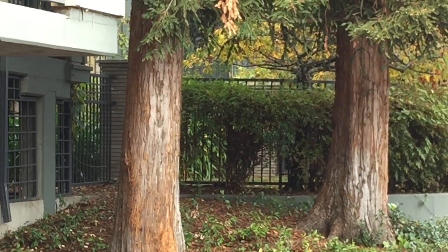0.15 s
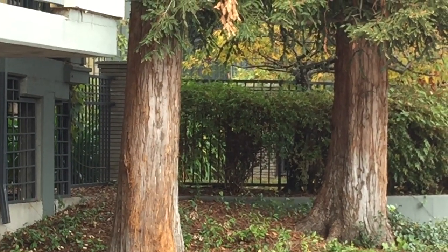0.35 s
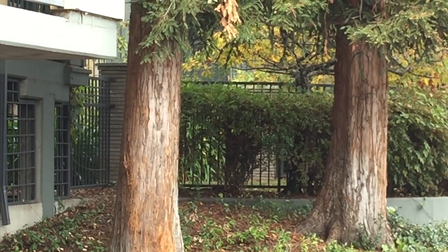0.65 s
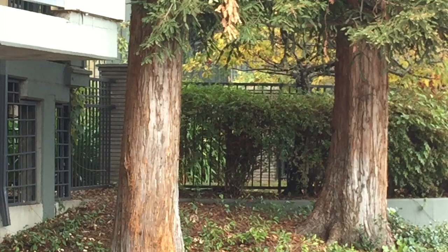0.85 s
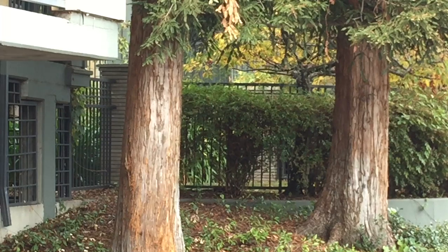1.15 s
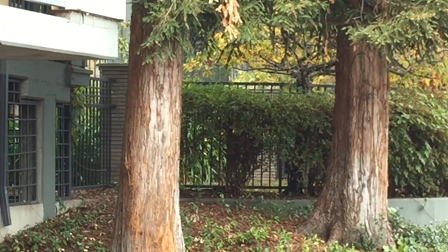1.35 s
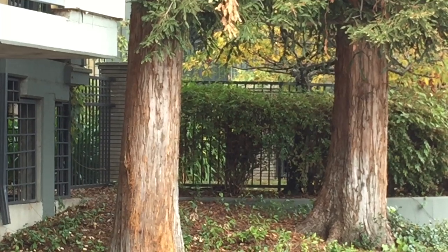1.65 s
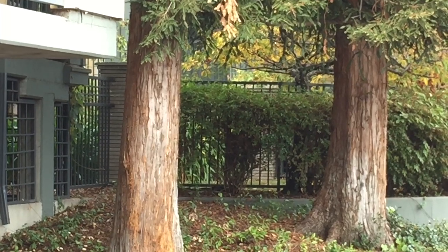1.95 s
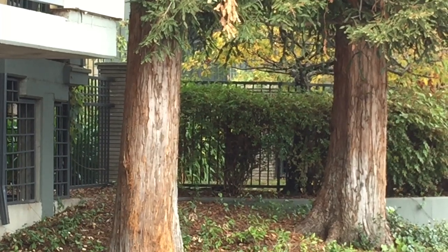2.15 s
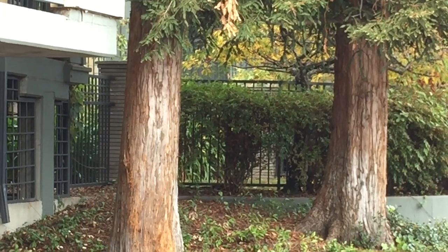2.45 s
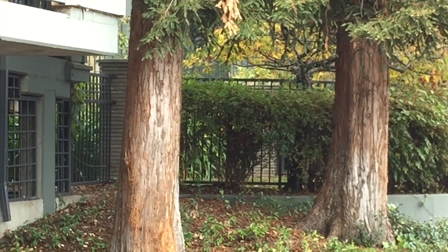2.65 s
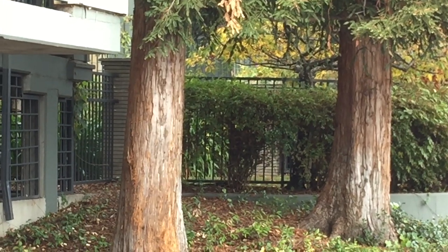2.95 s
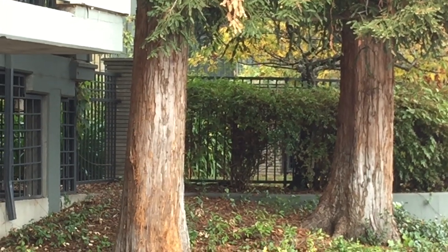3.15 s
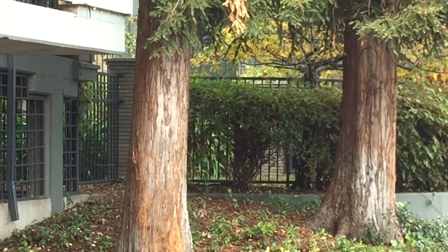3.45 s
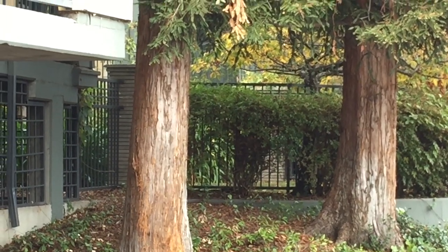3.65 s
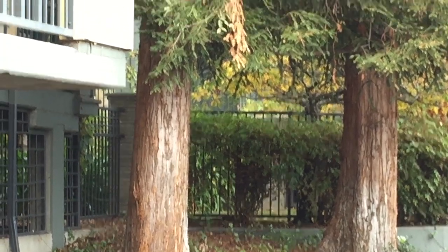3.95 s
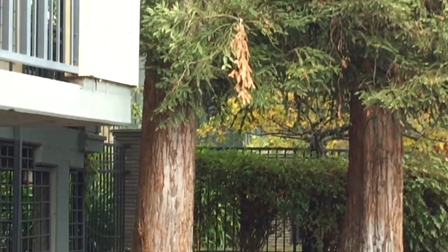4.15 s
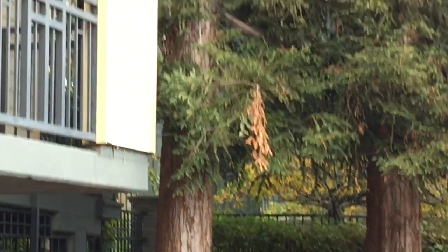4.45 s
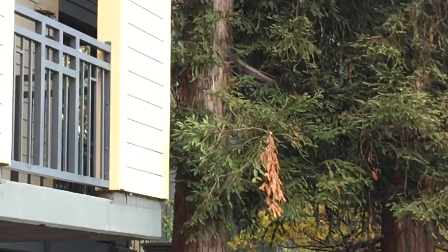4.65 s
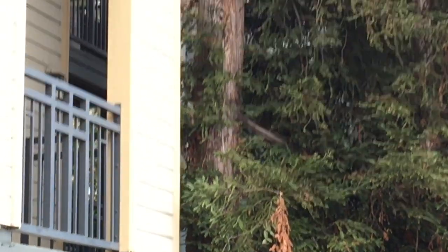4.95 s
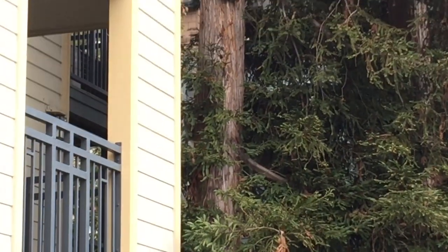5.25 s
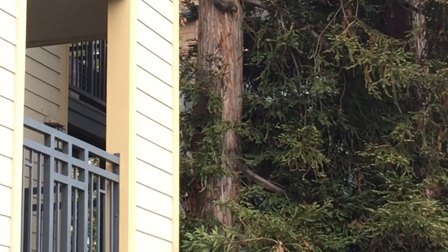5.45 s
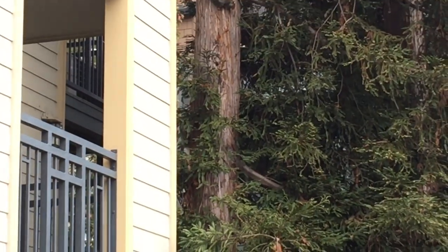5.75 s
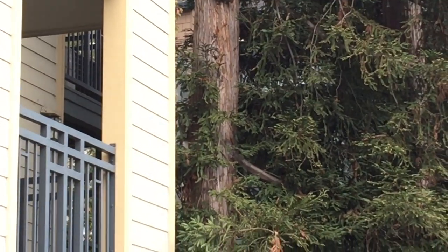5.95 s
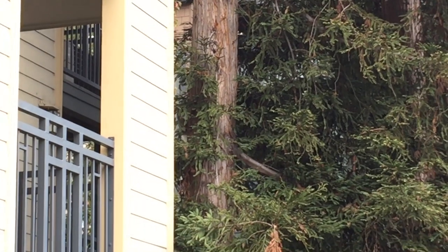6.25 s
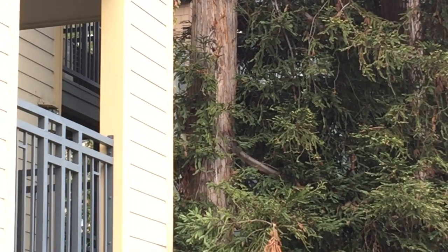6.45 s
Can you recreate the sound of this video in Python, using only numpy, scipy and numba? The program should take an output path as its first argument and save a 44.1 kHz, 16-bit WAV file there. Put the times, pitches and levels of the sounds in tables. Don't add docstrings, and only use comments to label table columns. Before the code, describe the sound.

A squirrel scolds from a tall tree beside a building. Two short hoarse chucks come first, then three long raspy barks about a second apart, each starting with a clear rising pitch and breaking into rasp. After a pause come four clipped chucks. A tiny bird squeak and later a faint buzz sit farther off. Distant traffic and a ventilation fan rumble low throughout; the microphone is outdoors, some way from the animal, with dull echoes.

```python
import sys
import numpy as np
from scipy import signal
from scipy.fft import rfft, irfft
from scipy.io import wavfile
from scipy.ndimage import uniform_filter1d
from numba import njit

SR = 44100
rng = np.random.default_rng(int(sys.argv[2]) if len(sys.argv) > 2 else 0)


def materialize(psi):
    bounded = np.clip(np.atleast_2d(psi).T, -1, 1)
    quanta = np.round(bounded * 32767).astype(np.int16)
    wavfile.write(sys.argv[1], SR, quanta)


def volts(x):
    e = np.asarray(x, float) / 20
    return 10 ** e


N = 291060


# start_s, length_s, throat_db, widest_mouth_hz, last_flare (0-2)
BARKS = [
    (1.337, 0.45, -45.5, 1617, 0.4),
    (2.355, 0.41, -45.5, 1536, 1.26),
    (3.462, .42, -46, 1540, 1.8),
]
# roughness (0-1), lasts_s
CLEAR_OPENINGS = [(.32, .035), (.13, .055), (.2, .04)]
# start_s, throat_db, attack_s, mouth_hz, hiss_db (over throat)
CHUCKS = [
    (0.243, -52.5, 0.027, 1070, -9.5),
    (0.458, -57.5, 0.015, 1200, -5.5),
    (5.248, -52.5, 0.033, 1080, -8.5),
    (5.587, -55.5, 0.018, 1250, -7),
    (5.923, -56, 0.023, 1120, -5),
    (6.363, -55.5, 0.024, 1075, -6),
]


def squirrel():
    out = np.zeros(N)
    for k, (row, opening) in enumerate(zip(BARKS, CLEAR_OPENINGS)):
        out += bark(*row, *opening, tired_db=-2.5 * k)
    for row in CHUCKS:
        out += chuck(*row)
    return out


# pitch_hz, width_hz, level_db
BARK_THROAT = [(1712, 9.6, 12.5), (2007, 480, 0), (2250, 27, -18), (2270, 28, 2.5), (2635, 216, -4),
               (3240, 197, -1.5)]
# pitch_hz, width_hz, level_db
BARK_LIPS = [(3300, 100, 9.5), (3625, 410, -2.5), (4250, 250, -9.5), (4550, 30, -2.5), (5480, 200, -15.5)]
# pitch_hz, width_hz, level_db
BARK_TEETH = [(6070, 810, -12), (6780, 790, -9), (7510, 430, -6), (8000, 210, -1.5), (8440, 430, -3),
              (9160, 570, -1), (9860, 280, -3)]


def bark(start_s, length_s, db, open_hz, flare, clear_rough, clear_s, tired_db):
    t = np.arange(round(length_s * SR)) / SR
    jaw_open_s, jaw_at_end = 0.14, 0.52
    jaw = np.sin(np.pi / 2 * np.minimum(t / jaw_open_s, 1))
    jaw = jaw - (1 - jaw_at_end) * ramp(t, length_s, length_s - jaw_open_s)
    mouth_shut_hz = 1070
    mouth_hz = mouth_shut_hz + (open_hz - mouth_shut_hz) * jaw

    last_air = ramp(t, length_s, 0.096)
    throat_db = db - 11 * np.exp(-t / 0.01) - 9.5 * t - 7 * ramp(t, length_s, 0.033)
    front_db = -2 - 2 * jaw + 6 * flare * last_air
    lips_db = -1 - 18 * jaw + 8.5 * flare * last_air
    teeth_db = -9.5 + 3.5 * np.exp(-t / 0.037) - 11.5 * last_air - 2 * t
    levels = (throat_db, front_db, lips_db, teeth_db)

    pitch_hz = np.interp(t, [0, 0.042], [535, 640]) - 60 * t
    catch_s, break_s = 0.01, 0.04
    times = [0, catch_s, clear_s, clear_s + break_s]
    rough = np.interp(t, times, [0.45, clear_rough, clear_rough, 0.66])
    # peak_s, peak_db, rise and fall in dB/s, upper edge_hz
    thin_hiss = (0.12, -22 + tired_db, 150, 110, 12800)
    return call(start_s, t, levels, mouth_hz, folds(t, pitch_hz, rough), BARK_THROAT, BARK_LIPS, BARK_TEETH,
                thin_hiss, belly_db=-52)


# pitch_hz, width_hz, level_db
CHUCK_THROAT_MODES = [(1450, 590, -36), (1597, 46, 10.5), (1830, 195, 12.5), (2145, 27, 15.5),
                      (2356, 36, 7.5), (2653, 86, 4.5), (3200, 175, 0)]
# pitch_hz, width_hz, level_db
CHUCK_LIP_MODES = [(3340, 680, 0), (4450, 550, -1), (5460, 620, -8.5)]
# pitch_hz, width_hz, level_db
CHUCK_TEETH_MODES = [(6100, 1500, -8), (7440, 270, -1), (8140, 1100, -7.5), (9430, 1000, -2)]


def chuck(start_s, db, attack_s, mouth_hz, hiss_db):
    length_s = 0.091
    t = np.arange(round(length_s * SR)) / SR
    done = t / length_s
    coming = np.clip(1 - t / attack_s, 0, 1)
    going = ramp(t, length_s, 0.03)
    throat_db = db - 14.5 * coming - 7.5 * going
    front_db = -12 + 7.5 * np.sin(np.pi * done)
    lips_db = -0.5 - 29.5 * done
    teeth_db = hiss_db + 6.5 * coming - 22 * going
    levels = (throat_db, front_db, lips_db, teeth_db)
    voice = folds(t, 580 + 600 * t, np.full(len(t), 0.8))
    # peak_s, peak_db, rise and fall in dB/s, upper edge_hz
    thin_hiss = (0.058, -15, 120, 450, 15100)
    return call(start_s, t, levels, mouth_hz + 190 * done, voice, CHUCK_THROAT_MODES, CHUCK_LIP_MODES,
                CHUCK_TEETH_MODES, thin_hiss, belly_db=2)


def folds(t, pitch_hz, rough):
    wobble = rng.standard_normal((len(t) // 60 + 1, 2))
    wobble = np.repeat(wobble, 60, axis=0)[:len(t)].T
    cycles = np.cumsum(pitch_hz * np.exp(0.3 * rough ** 2 * wobble[0])) / SR
    closures = np.diff(np.floor(cycles), prepend=0)
    openings = np.diff(np.floor(cycles + 0.5), prepend=0)
    pulses = (closures - 0.45 * openings) * volts(5 * rough * wobble[1])
    air = rng.standard_normal(len(t)) * (1 + 0.6 * np.cos(2 * np.pi * cycles))
    return rms_one(pulses), rms_one(air), rough


# pitch_hz, width_hz, level_db
THIN_HISS = [(10000, 700, 1.5), (11400, 2200, -4), (12000, 320, -19.5), (13800, 1100, -53)]


def call(start_s, t, levels, mouth_hz, voice, throat, lips, teeth, thin_hiss, belly_db):
    throat_db, front_db, lips_db, teeth_db = levels
    pulses, air, rough = voice
    source = np.sqrt(1 - rough) * pulses + np.sqrt(rough) * air

    r = np.exp(-np.pi * 125 / SR)
    turn = 2 * np.pi * mouth_hz / SR
    mouth = volts(3.5) * glide(glide(source, turn, r), turn, r)
    chest = volts(-17.0) * (1 - rough) * resonate(pulses, 680, 170)
    chest = chest + volts(belly_db) * resonate(air, 1000, 500)
    chest = chest + volts(4.0 - 42 * t) * resonate(source, 1058, 57)
    back = evened(steep(throat_modes(source, throat[:-3]), 1090) + mouth + chest)
    back = steep(back, 3240, "low")

    front = steep(throat_modes(source, throat[-3:]), 1750)
    front = evened(steep(front, 4190, "low"))
    share = np.minimum(volts(front_db), 0.95)
    sound = np.sqrt(1 - share ** 2) * back - share * front
    sound = sound + volts(lips_db) * evened(steep(body(source, lips), 5760, "low"))

    breath = 0.2 * pulses + air
    hiss = body(breath, teeth[:-2]) - volts(-25 * t) * body(breath, teeth[-2:])
    sound = sound + volts(teeth_db) * evened(steep(steep(hiss, 5640), 8840, "low"))

    peak_s, top_db, rise, fall, edge_hz = thin_hiss
    thin = steep(steep(body(air, THIN_HISS), 11400), edge_hz, "low")
    thin_db = top_db - rise * np.maximum(peak_s - t, 0) - fall * np.maximum(t - peak_s, 0)
    sound = sound + volts(thin_db) * evened(thin)

    out = np.zeros(N)
    start = round(start_s * SR)
    out[start:start + len(t)] = edges(t, 0.0013, 0.0071) * volts(throat_db) * sound
    return out


def throat_modes(x, modes):
    t = np.arange(len(x)) / SR
    climb = 0.14 * (t - len(x) / 2 / SR)
    out = 0
    for k, (hz, width_hz, db) in enumerate(modes):
        sway = np.interp(t, np.arange(12) / 22, rng.standard_normal(12))
        turn = 2 * np.pi * hz * (1 + 0.018 * sway + climb) / SR
        out = out + (-1) ** k * volts(db) * glide(x, turn, np.exp(-np.pi * width_hz / SR))
    return out


# time_s, pitch_hz, level_db
SQUEAK = [
    (2.775, 8450, -66),
    (2.785, 8055, -73),
    (2.8, 8000, -70),
    (2.812, 7840, -71),
    (2.825, 7800, -72),
    (2.845, 7800, -69),
    (2.856, 8400, -63),
    (2.872, 8104, -65),
    (2.885, 8000, -85),
]
# time_s, level_db, centre_hz
BUZZ = [
    (6.252, -78, 5700),
    (6.28, -63.5, 6250),
    (6.296, -59.5, 6900),
    (6.35, -75, 6780),
    (6.416, -62.5, 6800),
    (6.52, -83, 6400),
]
# time_s, peak_db, pitch_hz, width_hz
TICKS = [
    (2.811, -75, 6670, 150),
    (6.472, -70, 8900, 906),
]


def bird():
    out = np.zeros(N)
    start, t, (hz, db) = slice_of(SQUEAK)
    flutter = 1 + 0.21 * rms_one(uniform_filter1d(rng.standard_normal(len(t)), size=130))
    whistle = np.sin(2 * np.pi * np.cumsum(hz) / SR)
    out[start:start + len(t)] = edges(t, 0.0038, 0.006) * flutter * volts(db + 5) * whistle

    start, t, (db, hz) = slice_of(BUZZ)
    throb = rng.standard_normal(len(t)) * (1 + 0.24 * np.cos(2 * np.pi * 280 * t))
    buzz = glide(throb, 2 * np.pi * hz / SR, np.exp(-np.pi * 880 / SR))
    buzz = evened(steep(steep(buzz, 5800), 7400, "low"))
    out[start:start + len(t)] += edges(t, 0.01, 0.03) * volts(db) * buzz

    for time_s, db, hz, width_hz in TICKS:
        click = np.zeros(N) + 1e-18
        click[round(time_s * SR)] = volts(db) * SR / width_hz
        out += resonate(resonate(click, hz, width_hz), hz, width_hz)
    return out


# delay_ms, share
NEAR_WALLS = [(1.485, 0.08), (1.55, 0.08), (1.635, 0.28), (1.955, 0.1), (2.23, 0.08), (3.4, 0.08),
              (3.52, 0.08), (3.725, 0.13), (5.5, 0.08), (5.89, 0.07)]


def porch(x):
    hz = np.arange(N // 2 + 1) * SR / N
    bounce = sum(share * np.exp(-2j * np.pi * hz * ms / 1000) for ms, share in NEAR_WALLS)
    return irfft(rfft(x) * np.exp(1.73 * bounce), N) * volts(-1.5)


# pitch_hz, decay_s
YARD_DECAY = [(500, 0.79), (2000, 0.78), (3200, 0.54), (5000, 0.38), (8000, 0.27), (16000, 0.1)]


def yard(x):
    t = np.arange(SR) / SR
    white = rng.standard_normal(SR)
    response = 0
    for low in 400 * 2 ** np.arange(0, 5.5, 0.5):
        high = low * 2 ** 0.5
        sos = signal.butter(2, [low, high], "band", fs=SR, output="sos")
        decay_s = at_hz(YARD_DECAY, np.sqrt(low * high))
        response = response + signal.sosfilt(sos, white) * volts(-60 * t / decay_s)
    response = response * (1 + volts(12.5) * np.exp(-t / 0.028))
    gap_s, build_up_s = 0.0031, 0.0094
    response = response * np.clip((t - gap_s) / build_up_s, 0, 1) / np.sqrt(0.033 * SR)
    swaying = rms_one(uniform_filter1d(rng.standard_normal(N), size=160))
    return signal.fftconvolve(x * (0.4 + 0.9 * swaying), response)[:N]


# time_s, passing_engines_db, ventilation_load_db
RUMBLE = [(0, -51, -53.5), (.7, -54.5, -55.5), (1.3, -53, -51), (1.9, -54, -53), (2.5, -51, -54),
          (3.2, -52, -54), (3.8, -53, -57.5), (4.4, -53, -53), (5.1, -51.5, -50.5), (5.45, -53.5, -56),
          (6, -53.5, -49), (6.6, -52, -60.5)]
# pitch_hz, level_db (per Hz)
TRAFFIC = [(12, -64), (22, -21), (33, -42), (42, -16), (58, -2), (70, -8), (90, 1.5), (105, -6), (120, -6),
           (140, -7.5), (160, -10)]
# pitch_hz, width_hz, level_db
WHINES = [(493, 4, -89), (771, 13, -87), (992, 9.2, -80)]
# pitch_hz, level_db (per Hz)
DRONE = [(88, -28), (150, -1.5), (167, 1.5), (222, 1.5), (368, -10), (414, -15.5), (450, -18.5), (580, -57),
         (990, -120)]
# pitch_hz, level_db (per Hz)
AIR = [(240, -29), (400, -9), (481, -3.5), (511, -4.5), (605, -4.5), (821, -7), (887, -5), (957, -3.5),
       (1170, -8.5), (1740, -12), (3160, -19), (9370, -26.5), (10300, -29.5), (13500, -27), (15500, -29)]


def background():
    t = np.arange(N) / SR
    s, engines_db, fan_db = np.transpose(RUMBLE)
    traffic_db = np.interp(t, s, engines_db) + 2.0
    hum_db = np.interp(t, s, fan_db) - 2.0
    traffic = volts(traffic_db) * coloured(list(TRAFFIC) + [(220, -46), (400, -90)])
    hum_hz = 120.1
    hum = np.sqrt(2) * np.sin(2 * np.pi * hum_hz * t) + 0.73 * narrow(hum_hz, 14.8)
    whines = sum(volts(db) * narrow(hz, width_hz) for hz, width_hz, db in WHINES)
    patches = uniform_filter1d(rng.standard_normal(N), size=2500)
    patches = rms_one(uniform_filter1d(patches, size=2500))
    drone = volts(-62 + 2.2 * patches) * coloured(DRONE)
    return traffic + volts(hum_db) * hum + whines + drone + volts(-69) * coloured(AIR)


def coloured(spectrum):
    hz = np.arange(N // 2 + 1) * SR / N
    return rms_one(irfft(rfft(rng.standard_normal(N)) * volts(at_hz(spectrum, hz)), N))


def narrow(hz, width_hz):
    noise = rng.standard_normal(N + SR)
    return rms_one(resonate(resonate(noise, hz, width_hz), hz, width_hz)[SR:])


def resonate(x, hz, width_hz):
    r = np.exp(-np.pi * width_hz / SR)
    feedback = [1, -2 * r * np.cos(2 * np.pi * hz / SR), r * r]
    return signal.lfilter(np.array([1, 0, -1]) * (1 - r * r) / 2, feedback, x)


def body(x, modes):
    return sum((-1) ** k * volts(db) * resonate(x, hz, width_hz) for k, (hz, width_hz, db) in enumerate(modes))


@njit
def glide(x, turn, r):
    y = np.zeros(len(x))
    for i in range(2, len(x)):
        push = (1 - r * r) / 2 * (x[i] - x[i - 2])
        y[i] = push + 2 * r * np.cos(turn[i]) * y[i - 1] - r * r * y[i - 2]
    return y


def steep(x, hz, kind="high"):
    return signal.sosfilt(signal.butter(6, hz, kind, fs=SR, output="sos"), x)


def evened(x):
    return x / np.sqrt(uniform_filter1d(x ** 2, size=1100) + 1e-20)


def rms_one(x):
    return x / np.sqrt(np.mean(x ** 2) + 1e-20)


def edges(t, rise_s, fall_s):
    return np.clip(t / rise_s, 0, 1) * np.clip((t[-1] - t) / fall_s, 0, 1)


def ramp(t, length_s, last_s):
    return np.clip(1 - (length_s - t) / last_s, 0, 1)


def at_hz(points, hz):
    table_hz, value = np.transpose(points)
    return np.interp(np.log(hz + 1), np.log(table_hz), value)


def slice_of(rows):
    s, *columns = np.transpose(rows)
    t = np.arange(round((s[-1] - s[0]) * SR)) / SR
    return round(s[0] * SR), t, [np.interp(t + s[0], s, c) for c in columns]


def scene():
    near, far = squirrel(), bird()
    echoes = yard(volts(-6) * near + volts(-1.5) * far)
    return (porch(near) + far + echoes + background())[None]


def top_cut(x):
    return signal.sosfilt(signal.butter(12, 15745, fs=SR, output="sos"), x)


def record(dry):
    return top_cut(dry)


dry = scene()
out = record(dry)
materialize(out)
```